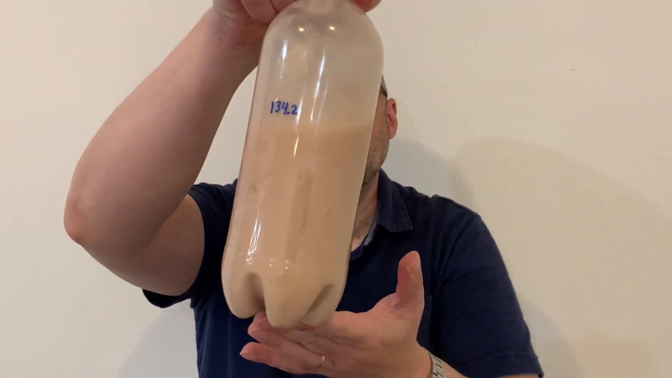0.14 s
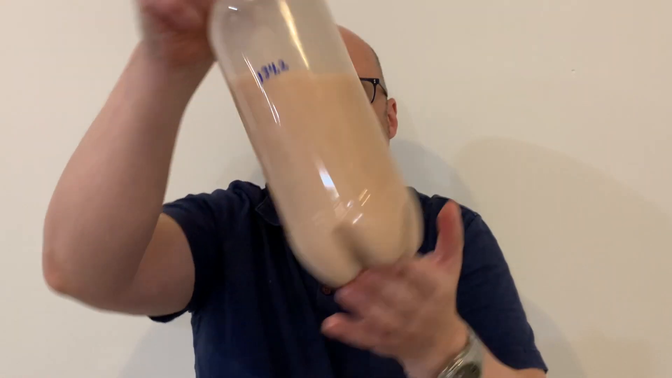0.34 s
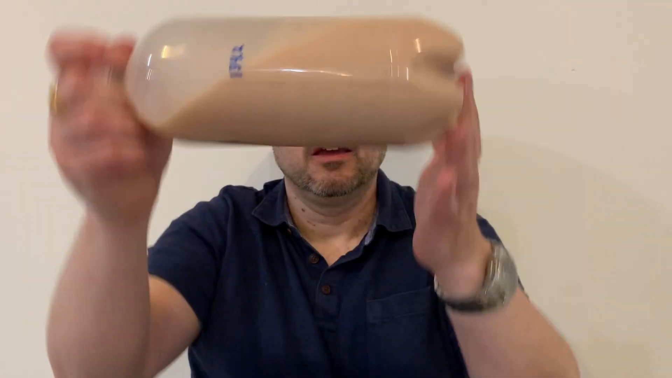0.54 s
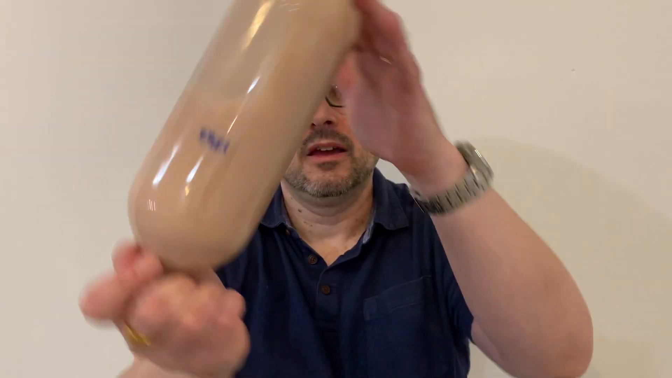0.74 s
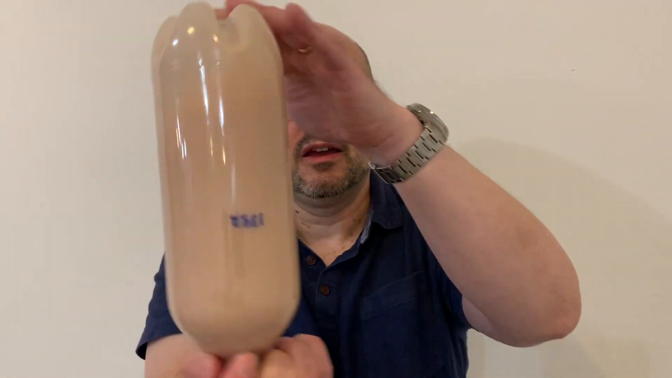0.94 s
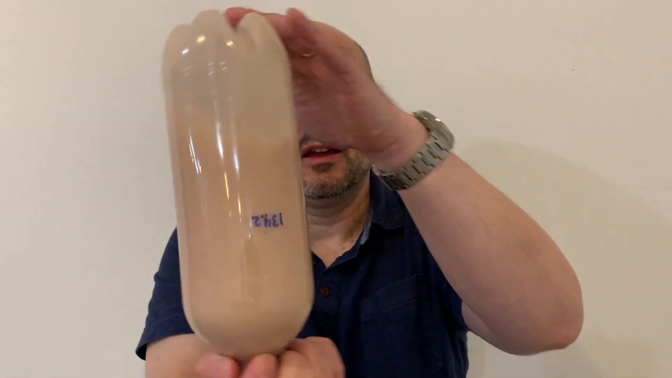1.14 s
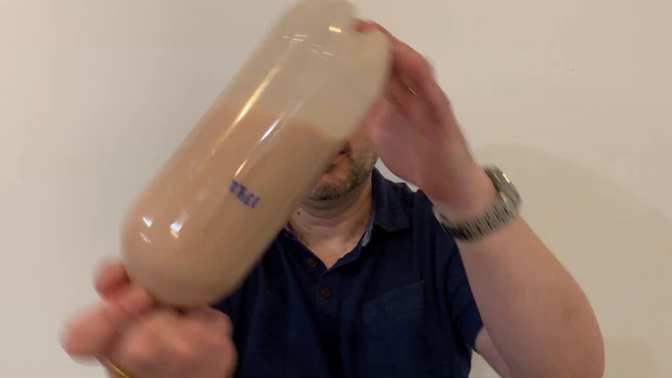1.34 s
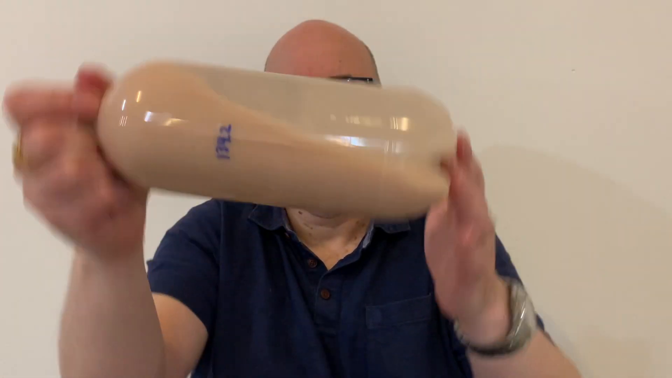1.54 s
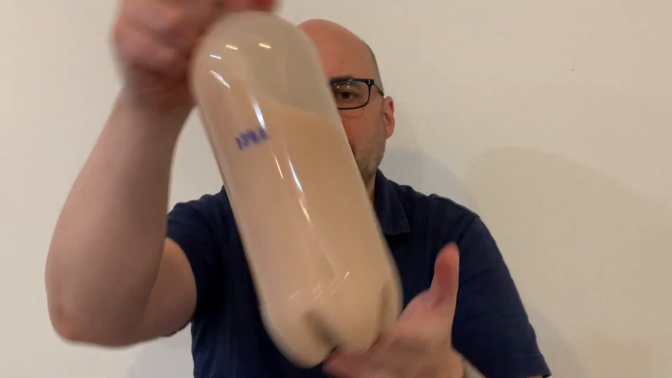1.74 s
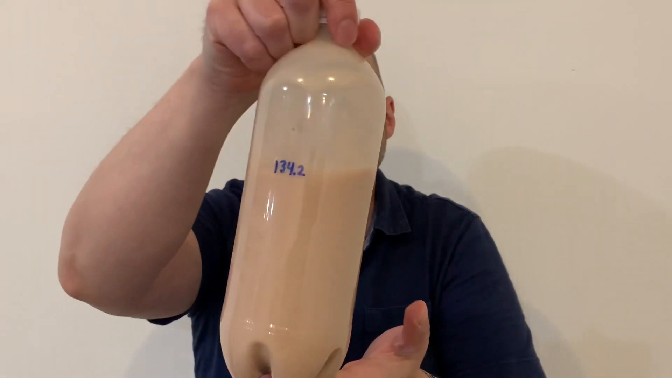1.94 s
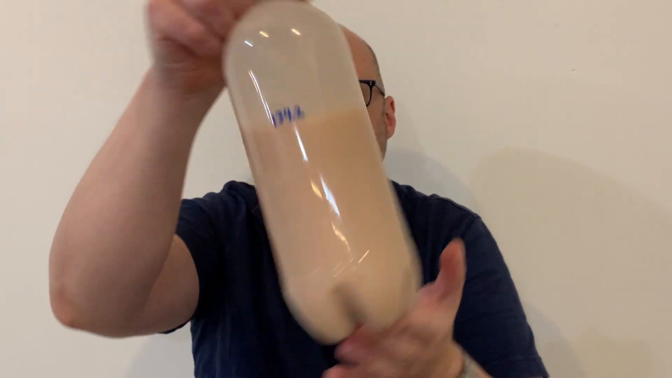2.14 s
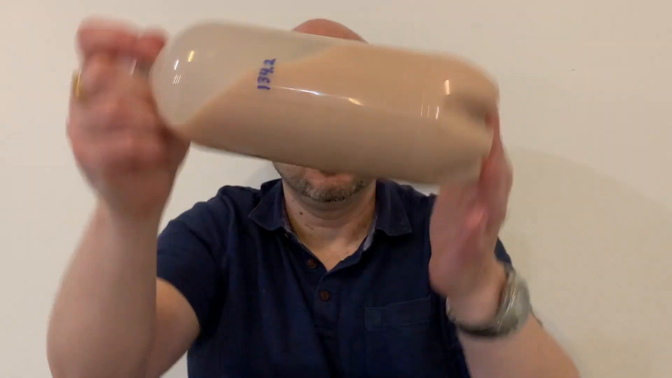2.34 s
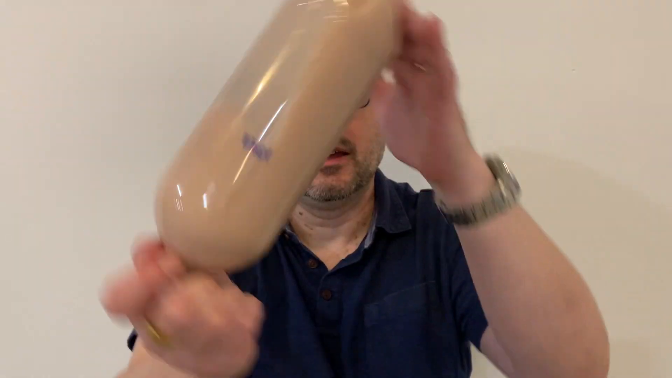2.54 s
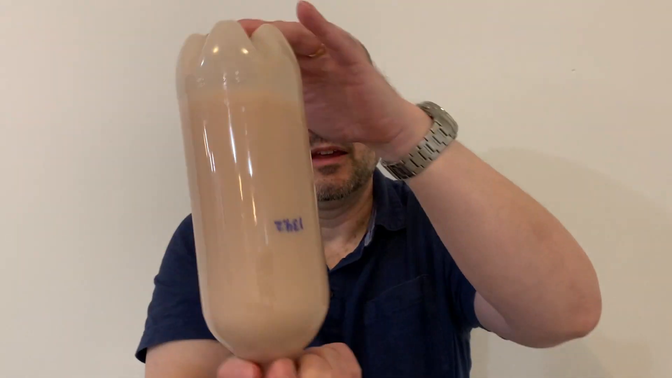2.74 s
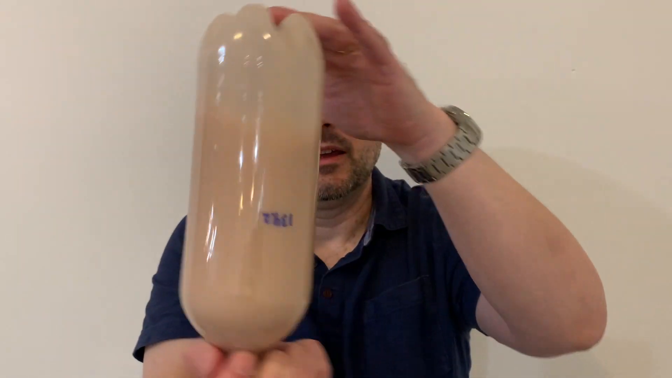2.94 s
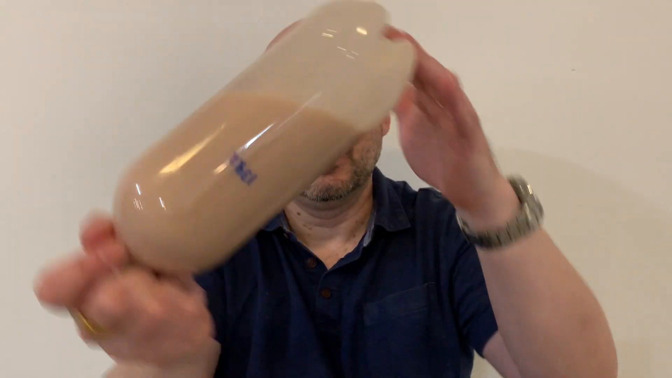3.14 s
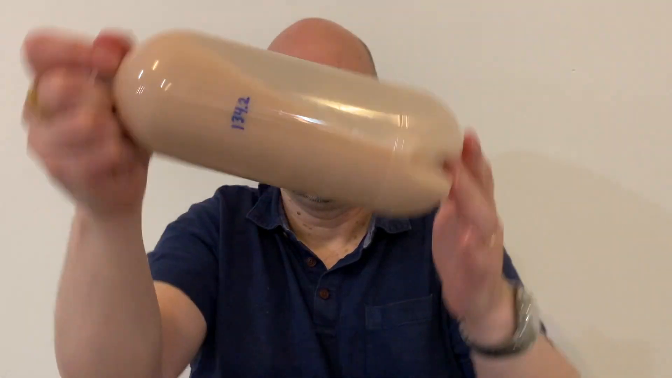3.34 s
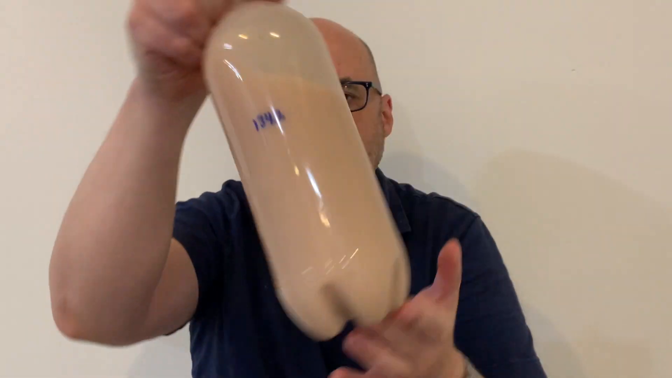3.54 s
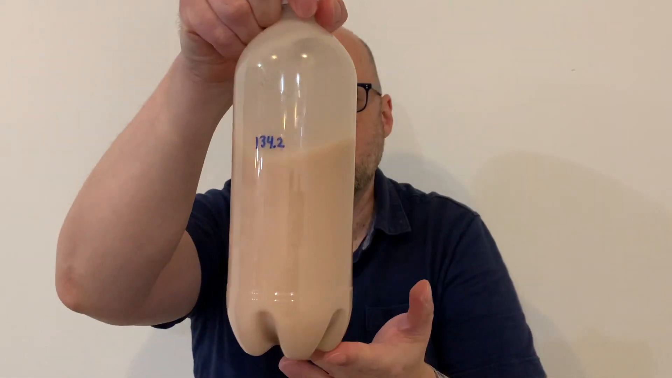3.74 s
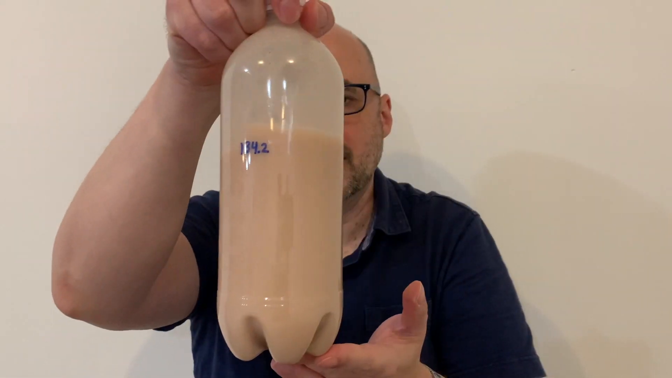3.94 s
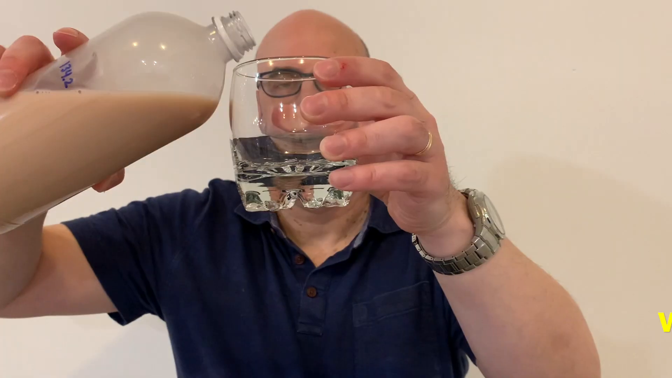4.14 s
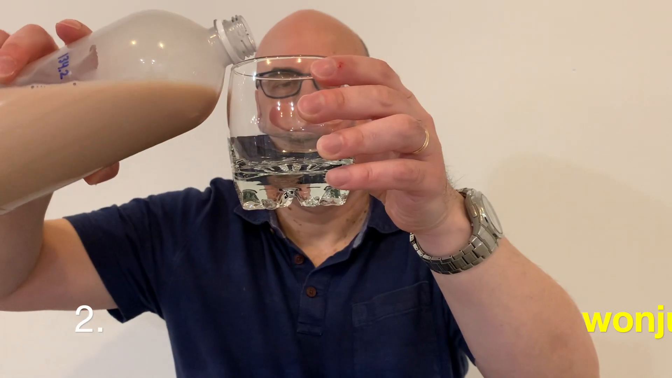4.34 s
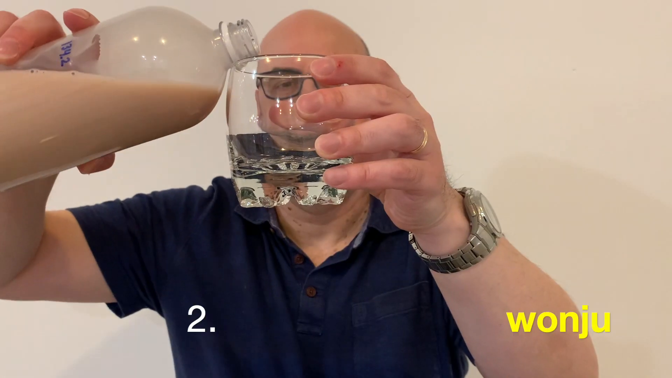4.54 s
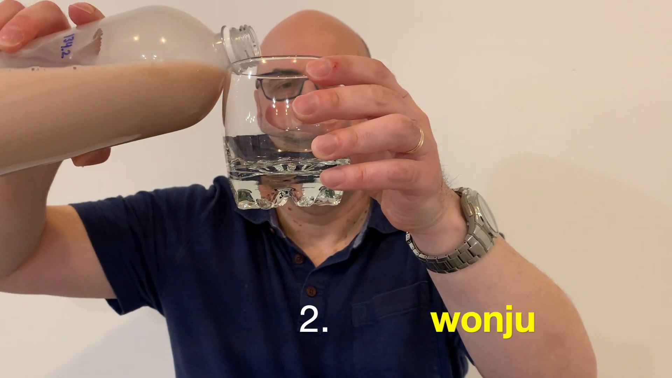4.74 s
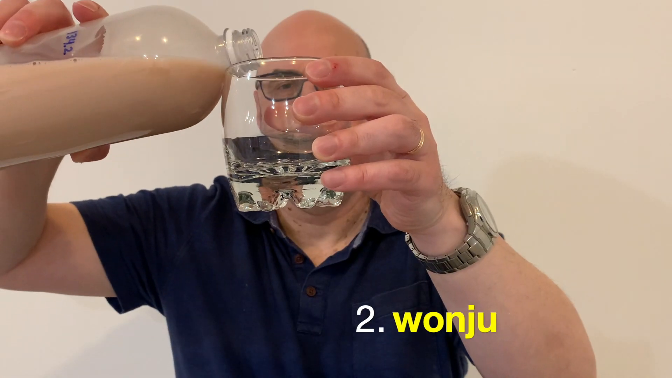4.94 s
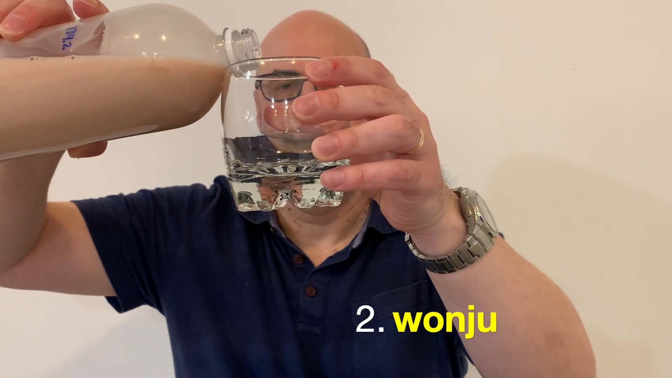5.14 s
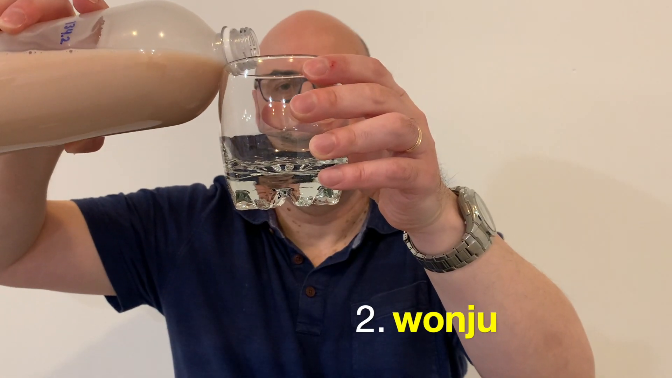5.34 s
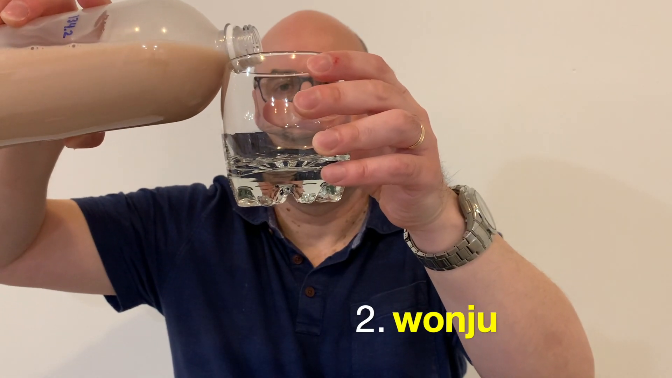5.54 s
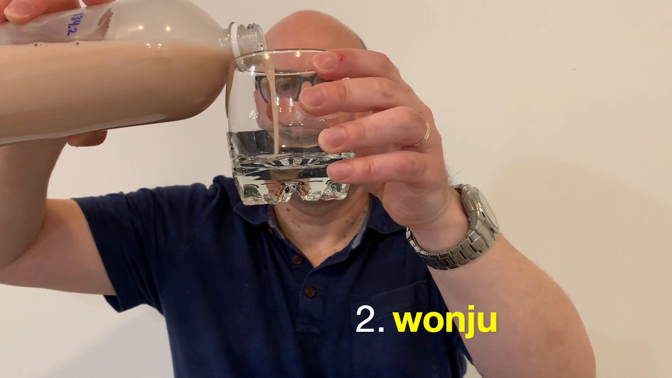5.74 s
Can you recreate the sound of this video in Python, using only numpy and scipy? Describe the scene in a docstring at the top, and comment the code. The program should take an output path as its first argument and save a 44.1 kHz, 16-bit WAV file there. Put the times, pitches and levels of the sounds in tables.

```python
"""A large plastic bottle of thick liquid is turned over five times in a small quiet room, near a phone. From
the start, each turn lets trapped air gulp and pop as gliding damped tones, drops splat and high bubbles pip as
short tones and puffs of noise, and liquid runs off as a wash of tiny tones over hiss. Near 2 s a hand slaps the
bottle; from 4.7 s it knocks against a glass, as ringing tones with a clack. Throughout, a low rumble tone near
61 Hz, uneven in pitch and level, and mains tones lie over shaped noise."""
import sys
import numpy as np
from scipy import signal
from scipy.fft import rfft, irfft, next_fast_len
from scipy.io import wavfile
from scipy.ndimage import uniform_filter1d

SR = 44100
rng = np.random.default_rng(int(sys.argv[2]) if len(sys.argv) > 2 else 0)


def master_out(mix):
    """Clip the mix to full scale and print it as 16-bit PCM to the path in sys.argv[1]."""
    frames = np.transpose(np.atleast_2d(mix))
    ceiling = np.clip(frames, -1, 1)
    pcm = np.round(ceiling * 32767).astype(np.int16)
    wavfile.write(sys.argv[1], SR, pcm)


N = 255763  # length of the sound [samples]
SIZE = next_fast_len(N)
HZ = np.arange(SIZE // 2 + 1) * SR / SIZE + 1e-3  # pitch of each spectrum bin, kept above 0 for the log


# Big air pockets closing:
# (time [s], level [dB], pitch [Hz], overtone against main tone [dB], decay to -60 dB [s])
AIR_GULPS = [(0.714, -38.5, 300.2, 0, 0.12), (0.769, -34, 464, -4, 0.033), (1.578, -32.5, 368, 1, 0.14),
             (1.615, -30.5, 542.6, 9.5, 0.06), (2.47, -42.5, 278, -8, 0.13), (2.495, -34, 282, -4.5, 0.066),
             (2.75, -43, 389, 5, 0.081), (3.356, -28.5, 353.1, 1, 0.11), (3.401, -28.5, 457, 7.5, 0.049)]
# Single bubbles: (time [s], level [dB], pitch [Hz])
SINGLE_BUBBLES = [(0.037, -32.5, 1550), (0.055, -36, 730), (0.063, -40.5, 1330), (0.113, -33, 1130),
                  (0.303, -55.5, 1560), (0.708, -33, 877), (0.769, -29.5, 748), (0.861, -45.5, 1090),
                  (0.92, -46, 1235), (0.957, -47, 1800), (.963, -46.5, 950), (1.038, -51.5, 818),
                  (1.083, -55, 690), (1.615, -23, 582), (1.626, -17, 802), (1.686, -33.5, 1250),
                  (1.728, -33, 1452), (1.853, -31, 1054), (2.471, -43.5, 890), (2.491, -42.5, 960),
                  (2.554, -45, 1191), (2.602, -46, 782), (2.506, -38, 810), (2.536, -42.5, 847),
                  (2.736, -40.5, 2020), (2.75, -40, 1046), (2.778, -40.5, 1650), (2.807, -41.5, 1104),
                  (2.852, -33, 1240), (2.869, -41, 1210), (2.904, -42, 1796), (2.906, -44, 807),
                  (3.0, -58.5, 1783), (3.052, -60.5, 2000), (3.292, -51.5, 730), (3.401, -17, 702),
                  (3.449, -32, 2267), (3.472, -21, 1237), (3.513, -39, 952), (3.565, -38.5, 1332),
                  (3.668, -34.5, 870), (3.698, -44.5, 910), (3.774, -50.5, 2172), (3.842, -56.5, 1140),
                  (4.161, -59.5, 1160)]
BUBBLE_T60_S, SHORTER_PER_DB = 0.029, 0.018  # decay of a -40 dB bubble; louder ones burst sooner
SHELL_HZ, SHELL_DB = 2453, -11.5  # the plastic wall answers every bubble, at this level against it


def pockets():
    """Gulps ring the air space with its overtone; bubbles are short tones that also shake the wall."""
    out = np.zeros(N)
    for s, db, hz, over_db, t60 in AIR_GULPS:
        add(out, s, ring(db, hz, t60, glide=0.11, rise=0.0015))
        add(out, s, ring(db + over_db, 1.885 * hz, 0.2 * t60))
    for s, db, hz in SINGLE_BUBBLES:
        t60 = BUBBLE_T60_S * np.exp(-SHORTER_PER_DB * (db + 40))
        add(out, s, ring(db, hz, t60, glide=0.078, rise=0.026 * t60))
        film_tearing = burst(db - 7.0, 0.49 * hz, 1.68 * hz, 1.27 * t60, rise=0.0026)
        add(out, s, film_tearing)
        shell = burst(db + SHELL_DB, 0.855 * SHELL_HZ, 1.16 * SHELL_HZ, 0.033, rise=0.002)
        add(out, s, shell)
    return out


# Splats and high bubbles: wide rows are drops splatting, narrow rows are high bubble pips:
# (time [s], level [dB], centre pitch [Hz], half width [octaves])
SPLATS_AND_PIPS = [(0.125, -36.5, 3720, 0.28), (0.185, -38, 2600, 0.27), (.24, -53, 3000, 0.83),
                   (.408, -43, 3200, 0.35), (0.621, -40.5, 4550, 0.4), (.707, -52, 5900, 0.14),
                   (0.74, -32.5, 4160, 0.13), (.740, -28.5, 4690, 0.33), (0.769, -37.5, 5450, .25),
                   (0.8366, -35, 5700, 0.34), (.88, -51, 3470, .4), (.96, -40.5, 7450, 0.16),
                   (0.988, -39.5, 3940, 0.24), (1.055, -50, 3480, 0.2), (1.082, -44, 2700, 0.04),
                   (1.513, -43, 6540, 0.27), (1.6136, -34, 6080, 0.26), (1.661, -32, 6860, 0.3),
                   (1.761, -37.5, 4100, 0.12), (1.871, -38.5, 7030, 0.18), (1.92, -39.5, 5050, 0.41),
                   (2.47, -30.5, 4610, 0.35), (2.566, -34.5, 3730, 0.21), (2.6025, -32, 2700, 0.089),
                   (2.673, -42, 4450, 0.2), (2.761, -47.5, 5260, .1), (2.85, -46.5, 5600, 0.26),
                   (2.9009, -48, 4900, 0.21), (3.2897, -45, 5480, 0.17), (3.3854, -47, 4940, 0.3),
                   (3.4, -30.5, 4520, 0.38), (3.47, -33.5, 3950, 0.29), (3.5306, -47, 3930, 0.11),
                   (3.565, -48, 4830, 0.084), (3.6979, -39.5, 6565, 0.28), (3.904, -53, 3986, 0.035),
                   (4.047, -52, 1502, 0.695)]
# Thin spits at the very top: (time [s], level [dB], centre pitch [Hz])
HIGH_SPITS = [(0.1264, -40.5, 9900), (0.7701, -45, 10300), (0.836, -50, 11550), (0.9208, -48, 10000),
              (1.6154, -53, 15300), (1.6616, -34.5, 15100), (1.8711, -57, 11300), (2.4703, -55, 14360),
              (2.602, -48.5, 14240), (3.2899, -53, 9380), (3.3857, -43.5, 14700), (3.403, -49, 10400),
              (3.472, -36.5, 9400), (3.5307, -42, 15050), (3.6331, -44, 9820), (4.9262, -50.5, 12660)]
SPLAT_T60_S, SPIT_T60_S = 0.052, 0.031  # splat parts last a share or multiple of the first


def splats_and_pips(count=6):
    """Narrow rows pip like high bubbles, wide ones splat as scattered pips and a puff; spits hiss on top."""
    out = np.zeros(N)
    t60 = SPLAT_T60_S
    for s, db, hz, octaves in SPLATS_AND_PIPS:
        wide = 2 ** np.clip(octaves, 0.03, 1)  # half width as a pitch ratio
        add(out, s, ring(db - 0.5 - 35 * octaves, hz, 0.41 * t60, glide=0.048, rise=0.00099))
        for late, pitch, size in rng.random((count, 3)):
            small_db = db - 9 - 22 * late - 8 * size  # later small pips are weaker
            small_hz = hz * wide ** (3 * pitch - 1.5)
            add(out, s + 1.1 * late * t60, ring(small_db, small_hz, 35 / hz, rise=0.0006))
        puff = burst(db - 10.5, hz / wide ** 2, hz * wide ** 2, 0.65 * t60, rise=0.0014)
        add(out, s, puff)
    for s, db, hz in HIGH_SPITS:
        add(out, s, burst(db, 0.84 * hz, 1.08 * hz, SPIT_T60_S, rise=0.00088))
    return out


# Colour of the bubbling froth: (pitch [Hz], relative level [dB per Hz])
FROTH_COLOUR = [(300, -18.5), (600, -12.5), (1100, -5.5), (1700, -2.5), (2350, -1.5), (3300, -17)]
# Colour of the finer spray: (pitch [Hz], relative level [dB per Hz])
SPRAY_COLOUR = [(2700, 6.5), (4500, -2.5), (7000, -6.5), (10500, -6.5), (15000, -15.5), (16800, -67)]
# When the bottle is turned over: (start [s], end of the run-off [s])
BOTTLE_TURNS = [(0, .33), (.703, 1.15), (1.575, 2.15), (2.466, 3.1), (3.353, 3.9)]


def wash():
    """Froth of bubbles over a gurgling hiss, and a finer crackle of droplets over a patchy hiss."""
    # random levels, each held for 500 samples, then smoothed
    steps = np.repeat(rng.standard_normal((2, N // 500 + 1)), 500, axis=1)[:, :N]
    patches = uniform_filter1d(steps, size=400)
    froth = undb(-6 + 4 * patches[0]) * noise([(150, -30)] + FROTH_COLOUR + [(5000, -40)])
    spray = undb(-5 + 4.5 * patches[1]) * noise([(1500, -40)] + SPRAY_COLOUR)
    droplet_colour = SPRAY_COLOUR[:3] + [(8500, -8)]
    for t0, t1 in BOTTLE_TURNS:
        froth = froth + swarm(FROTH_COLOUR, t0, t1, rate=800, cycles=20.0, scatter_db=3.5)
        spray = spray + swarm(droplet_colour, t0, t1, rate=800, cycles=35.0, scatter_db=3.0)
    _, froth_db, spray_db = np.transpose(LIQUID_SURGES)
    flowing_froth = surges(froth_db, FALL_DB_PER_S) * froth
    flowing_spray = surges(froth_db + spray_db, SPRAY_FALL_DB_PER_S) * spray
    return flowing_froth + flowing_spray


def swarm(table, t0, t1, rate, cycles, scatter_db):
    """Small bubbles at random moments, pitches and sizes, coloured by a table; rms 1 while they last."""
    out = np.zeros(N)
    lo, hi = np.log(np.array(table)[[0, -1], 0])
    for when, pitch, size in rng.random((int(rate * (t1 - t0)), 3)):
        hz = np.exp(lo + pitch * (hi - lo))
        db = along(table, hz) - scatter_db * np.log(size + 0.02)  # a few are much louder
        add(out, t0 + when * (t1 - t0), ring(db, hz, cycles / hz, glide=0.27, rise=2 / hz))
    return out / np.sqrt(np.sum(out ** 2) / ((t1 - t0) * SR))


# Surges of liquid along the wall: (time of the crest [s], level [dB], spray against froth [dB])
LIQUID_SURGES = [(0.059, -46.5, -5.5), (.125, -54, -6), (0.742, -47.5, -3.5), (.8, -53.5, -7),
                 (.85, -58, -1.5), (0.883, -55, -6), (0.952, -50.5, -8.5), (0.999, -57, -7.5),
                 (1.6, -58, 1), (1.679, -42.5, -4), (1.745, -56.5, 0), (1.861, -47.5, -6.5),
                 (1.93, -59.5, -4), (2.02, -65, -5), (2.498, -51.5, -8.5), (2.608, -46.5, -9),
                 (2.67, -57.5, -4.5), (2.751, -51, -8), (2.82, -55.5, -7), (2.908, -57.5, -12),
                 (2.99, -70, -25), (3.369, -55, -5), (3.488, -54, 8), (3.55, -56.5, -30), (3.651, -55, -14),
                 (3.703, -49.5, -4), (3.8, -82.5, -22)]
RISE_DB_PER_S, FALL_DB_PER_S, SPRAY_FALL_DB_PER_S = 282, 183.5, 240


def surges(db, fall_db):
    """Each surge swells to its crest and drains away; powers add, and nothing flows outside a turn."""
    t = np.arange(0, N, 32) / SR  # one level for every 32 samples
    late = t - np.array(LIQUID_SURGES)[:, :1]
    slope_db = np.minimum(RISE_DB_PER_S * late, -fall_db * late)
    power = undb(2 * (db[:, None] + slope_db)).sum(axis=0)
    flowing = sum((t >= t0) & (t < t1) for t0, t1 in BOTTLE_TURNS)
    return np.repeat(flowing * np.sqrt(power), 32)[:N]


# A hand slaps the bottle, later it meets the glass:
# (time [s], ring level [dB], ring pitch [Hz], partner level [dB], partner pitch [Hz],
#  ring decay to -60 dB [s], clack level [dB], clack centre [Hz], tick level [dB])
BOTTLE_KNOCKS = [(2.0064, -29.5, 1780, -26, 2182, 0.015, -39, 2100, -63),
                 (4.696, -34.5, 243.5, -38.5, 277, 0.26, -41.5, 840, -39.5),
                 (4.927, -40, 710, -41.5, 347, 0.025, -40.5, 994, -52),
                 (5.158, -54, 886, -57.5, 3310, 0.059, -59, 1500, -69)]


def knocks():
    """The full bottle rings with two tones; the contact clacks and ticks."""
    out = np.zeros(N)
    for s, db, hz, partner_db, partner_hz, t60, clack_db, clack_hz, tick_db in BOTTLE_KNOCKS:
        add(out, s, ring(db, hz, t60, rise=0.03 * t60))
        add(out, s, ring(partner_db, partner_hz, 0.81 * t60, rise=0.018 * t60))
        add(out, s, burst(clack_db, 0.5 * clack_hz, 1.64 * clack_hz, 0.051, rise=0.00051))
        rough_tail = burst(clack_db - 10.5, 0.4 * clack_hz, 1.8 * clack_hz, 0.18, rise=0.0022)
        add(out, s, rough_tail)
        add(out, s, burst(tick_db, 2600.0, 6500.0, 0.04))
    return out


ROOM_T60_S, ROOM_DB, WALL_S, WALL_DB = 0.11, -10.5, 0.009, -16.5  # diffuse tail, then wall echo


def room(x):
    """One near wall echo, and a dulled diffuse tail that differs left and right."""
    t, env = fade(ROOM_T60_S, 0.0076)
    tail = env * rng.standard_normal((2, len(t)))
    tail = signal.lfilter([0.6], [1, -0.4], tail / np.sqrt(np.sum(env ** 2)))  # softens the treble
    wet = undb(ROOM_DB) * signal.oaconvolve(x[None], tail, axes=1)[:, :N]
    echo = undb(WALL_DB) * np.roll(x, int(WALL_S * SR))
    return ports(x + echo) + wet


# How far the left port leads the right: (pitch [Hz], lead [radians])
LEFT_LEAD = [(0, 0.), (150, .15), (1030, .6), (1900, 1.7), (3200, 3.1), (6200, 6.3), (16500, -7.3)]
# How much louder the left port is: (pitch [Hz], left minus right [dB])
LEFT_TILT = [(100, -3), (300, -0.5), (600, 3.5), (1200, 5), (2200, -2), (5000, -8), (8000, 1)]


def ports(x):
    """The two microphone ports hear one sound with a lead and a tilt that change with pitch."""
    half_lead = np.exp(0.5j * np.interp(HZ, *np.transpose(LEFT_LEAD)))
    half = half_lead * undb(along(LEFT_TILT, HZ) / 2)
    return shape(x, np.array([half, 1 / half]))  # left gets half of it, right the opposite half


# A low rumble tone near 61 Hz, uneven in pitch and level: (time [s], pitch [Hz], level [dB])
LOW_RUMBLE = [(0.0, 58.54, -51), (0.5, 58.28, -44.5), (0.92, 63.3, -52), (1.02, 61.2, -41),
              (1.15, 62.9, -61), (1.26, 62.24, -49), (1.58, 65.46, -56), (1.78, 59.3, -45.5),
              (1.97, 63.96, -46.5), (2.34, 61.63, -41.5), (2.62, 59.93, -48.5), (2.76, 59.8, -37.5),
              (2.84, 61, -55), (3.15, 60.94, -43), (3.78, 61.03, -48), (3.89, 59.3, -48),
              (4.17, 62.94, -42.5), (4.31, 58.26, -57.5), (4.55, 58.8, -40.5), (4.65, 58.5, -55),
              (4.85, 58.4, -45), (4.96, 62.0, -37), (5.05, 62, -48.5), (5.25, 62.2, -39.5),
              (5.39, 63.2, -56), (5.8, 57.2, -41.5)]
# Steady mains tones: (pitch [Hz], level [dB])
MAINS_TONES = [(120, -54), (240, -70.5)]
# Colour of the wide rumble and hiss: (pitch [Hz], relative level [dB per Hz])
ROOM_COLOUR = [(22, -50.5), (40, -0.5), (60, 1.5), (95, 1), (170, -5.5), (260, -15), (450, -26),
               (1000, -37.5), (2500, -44.5), (6500, -50.5), (8500, -48), (15600, -48.5), (16000, -63.5)]
# How alike the two sides are: (pitch [Hz], share of the room tone's power common to both [0 to 1])
SIDES_ALIKE = [(130, 0.91), (300, 0.59), (650, 0.2), (5800, 0.036), (8000, 1)]
ROOM_TONE_DB = -48


def background():
    """Wide rumble and hiss, a narrow low rumble near 61 Hz drawn as one uneven sine, and mains tones."""
    t = np.arange(N) / SR
    s, hz, db = np.transpose(LOW_RUMBLE)
    phase = 2 * np.pi * np.cumsum(np.interp(t, s, hz)) / SR
    narrow_rumble = undb(np.interp(t, s, db)) * np.sin(phase)
    mains = sum(undb(d) * np.sin(2 * np.pi * f * t) for f, d in MAINS_TONES)
    tones = np.sqrt(2) * (narrow_rumble + mains)  # table levels are rms, so peaks are larger
    alike = np.clip(along(SIDES_ALIKE, HZ), 0, 1)
    common = shape(noise(ROOM_COLOUR), np.sqrt(alike))
    apart = shape(np.array([noise(ROOM_COLOUR), noise(ROOM_COLOUR)]), np.sqrt(1 - alike))
    return ports(tones + undb(ROOM_TONE_DB) * common) + undb(ROOM_TONE_DB) * apart


def ring(db, hz, t60, glide=0.0, rise=0.00066):
    """A damped sine whose pitch climbs by the share `glide` over its decay, like a shrinking bubble."""
    t, env = fade(t60, rise)
    return undb(db) * env * np.sin(2 * np.pi * hz * t * (1 + glide * t / (2 * t60)))


def burst(db, lo_hz, hi_hz, t60, rise=0.00016):
    """A decaying puff of band noise."""
    t, env = fade(t60, rise)
    edges = np.clip([lo_hz, hi_hz], 50, 0.45 * SR)
    band = signal.butter(3, edges, "band", fs=SR, output="sos")
    x = signal.sosfilt(band, rng.standard_normal(len(t)))
    return undb(db) * env * x / (2 * x.std())


def fade(t60, rise):
    """Time axis [s] and envelope of peak 1: a rounded rise, then decay by 60 dB in t60 seconds."""
    t = np.arange(int(np.clip(t60, 0.005, 1) * SR)) / SR
    env = (1 - np.exp(-t / rise)) ** 2 * np.exp(-np.log(1000) * t / t60)
    return t, env / env.max()


def add(track, s, sound):
    """Mix a sound into the track from time s [s], cutting it at the end."""
    i = int(s * SR)
    track[i:i + len(sound)] += sound[:N - i]


def noise(table):
    """Noise of rms 1 with the colour of a (pitch [Hz], level [dB]) table."""
    x = shape(rng.standard_normal(N), undb(along(table, HZ)))
    return x / x.std()


def shape(x, gain):
    """Multiply the spectrum by a gain."""
    return irfft(rfft(x, SIZE) * gain, SIZE)[..., :N]


def along(table, hz):
    """Read a (pitch [Hz], value) table on a log-frequency axis."""
    f, v = np.transpose(table)
    return np.interp(np.log(hz), np.log(f), v)


def undb(db):
    """Turn decibels into an amplitude factor."""
    return 10 ** (np.asarray(db) / 20)


def scene():
    """The bottle in its room over the background."""
    return room(pockets() + splats_and_pips() + wash() + knocks()) + background()


TOP_HZ = 16650


def record(dry):
    """The phone cuts the top with a steep low-pass filter."""
    return signal.sosfilt(signal.ellip(8, 0.2, 70, TOP_HZ, fs=SR, output="sos"), dry)


dry = scene()
out = record(dry)
master_out(out)
```